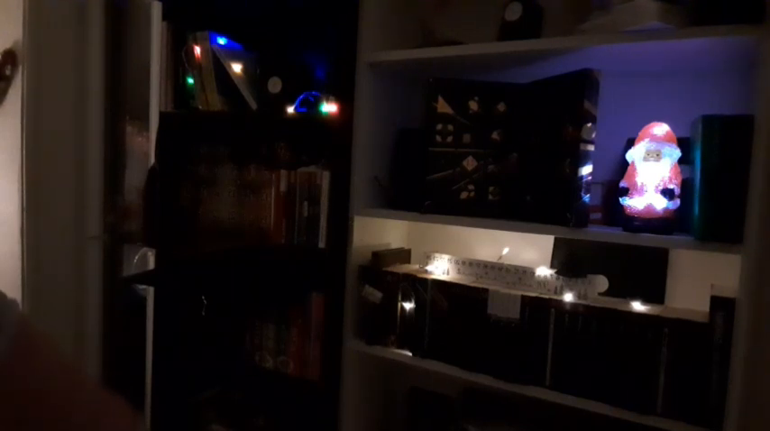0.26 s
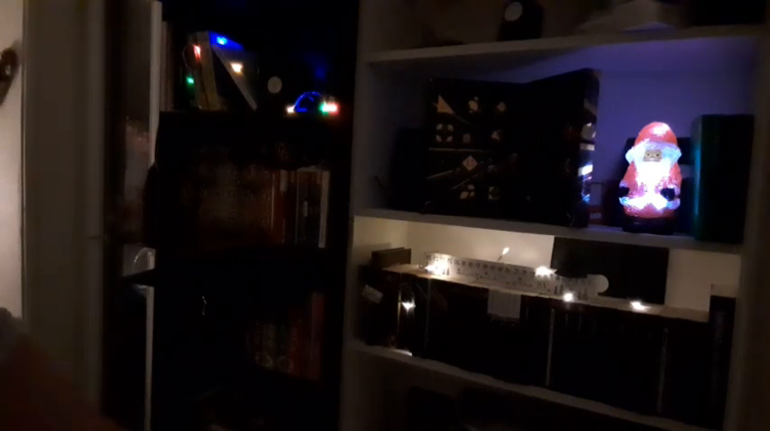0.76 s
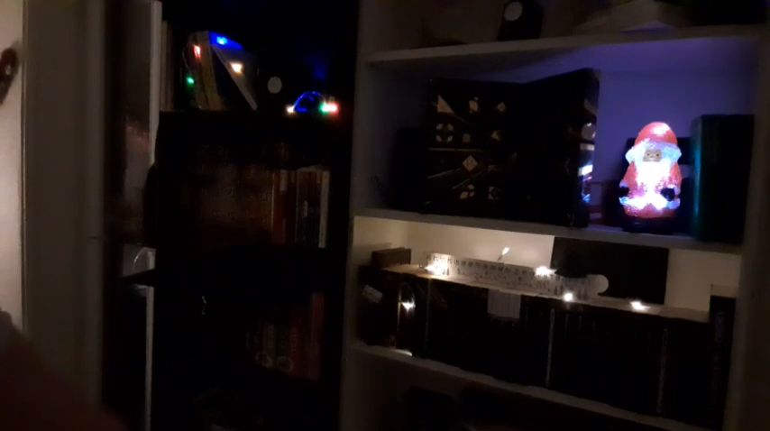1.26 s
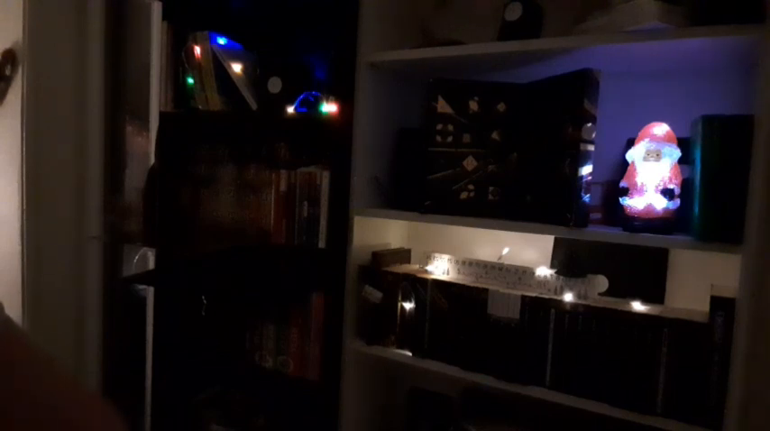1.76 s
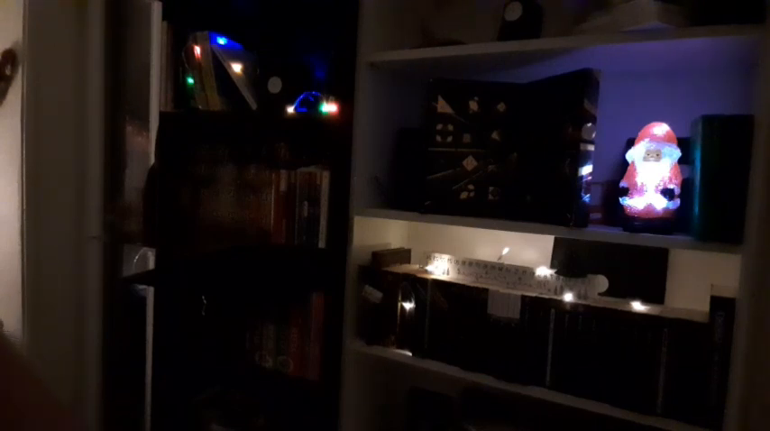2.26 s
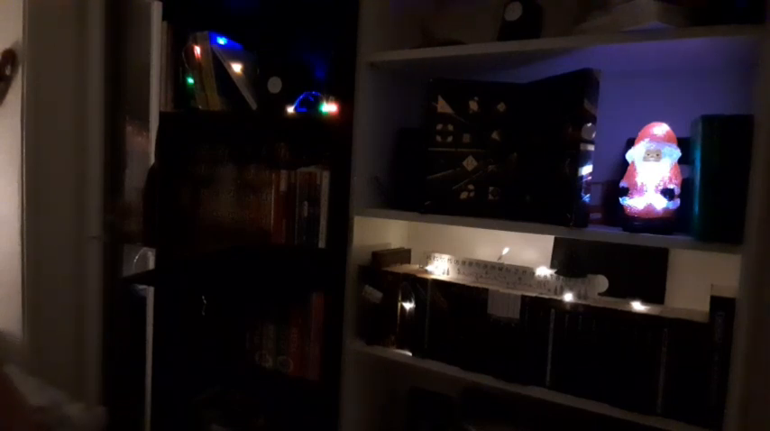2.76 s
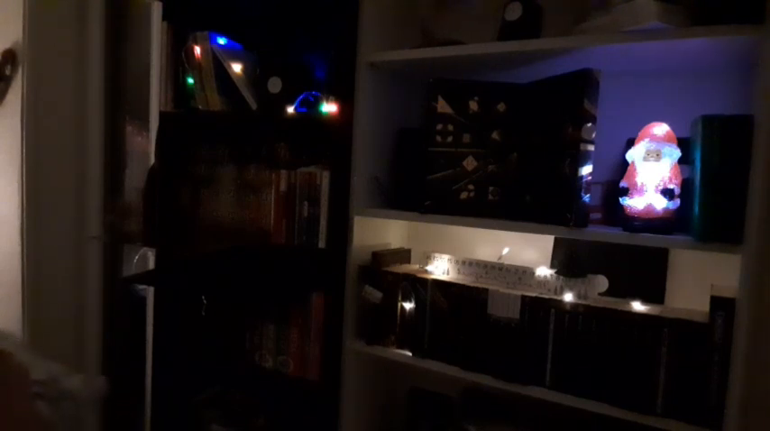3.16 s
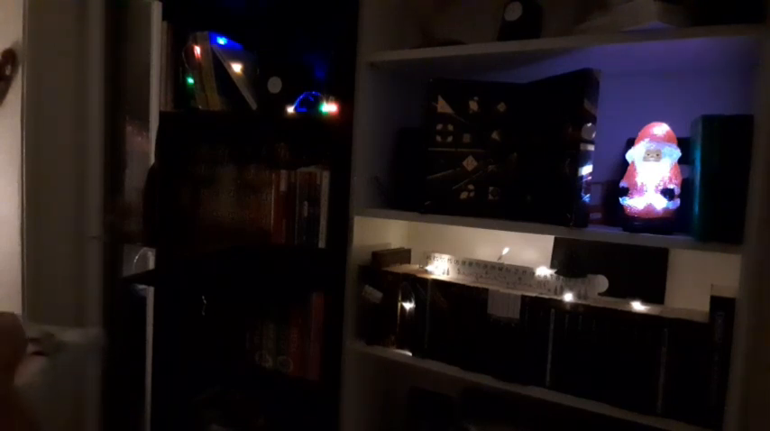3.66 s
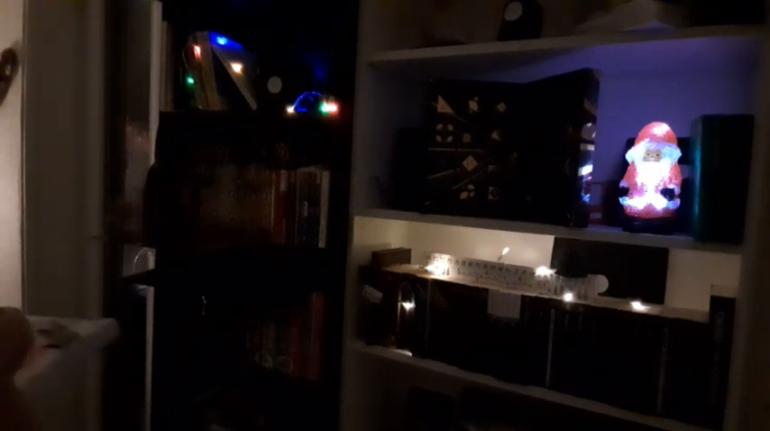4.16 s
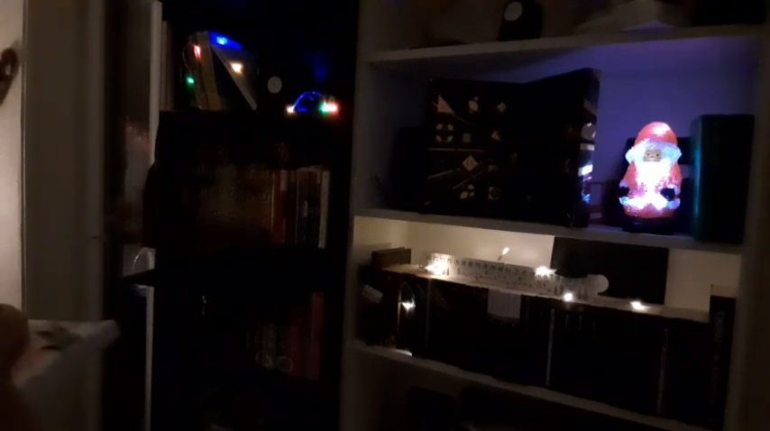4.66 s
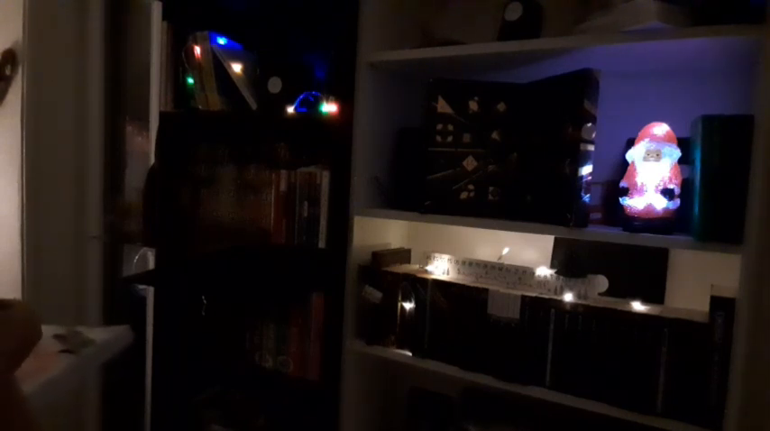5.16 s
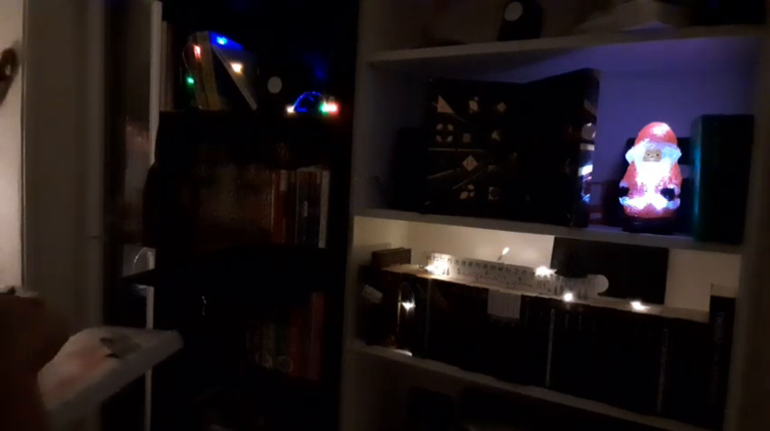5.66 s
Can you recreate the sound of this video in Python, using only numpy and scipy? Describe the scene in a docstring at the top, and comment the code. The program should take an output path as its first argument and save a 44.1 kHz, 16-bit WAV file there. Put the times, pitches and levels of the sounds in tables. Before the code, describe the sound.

Hands tear open a cardboard package with dull pops, then rip and crinkle its stiff plastic wrapper in a quiet room.

```python
"""Dull pops of cardboard, close by and a little to the left, as hands tear a package open.
Fibres break in quick runs and ring the hollow box. The stiff plastic wrapper inside rips, fingertips
slide over it, and its creases buckle in sharp snaps, each trailed by smaller crackles.
A quiet living room rings on after every snap, over a faint steady hush."""
import sys
import numpy as np
from scipy import signal
from scipy.fft import rfft, irfft, next_fast_len
from scipy.io import wavfile

SR = 44100
rng = np.random.default_rng(int(sys.argv[2]) if len(sys.argv) > 2 else 0)


def wrap_up_sound(samples):
    """Save the sound to the file named by the first command line argument, as 16-bit audio."""
    columns = np.atleast_2d(samples).T
    # keep every value between -1 and 1, then stretch to whole-number steps
    tamed = np.clip(columns, -1, 1)
    steps = np.round(tamed * 32767).astype(np.int16)
    wavfile.write(sys.argv[1], SR, steps)


N = 261513
LEAD = SR // 4   # samples of run-in, so that the room already rings at the start
SPAN, ONSET_PAD = SR * 3 // 4, SR // 2000   # samples for one burst and its tail; silent samples before it


def from_db(db):
    return 10 ** (np.asarray(db) / 20)


def rms_one(x):
    return x / np.sqrt(np.mean(x ** 2) + 1e-20)


def later(x, delay_s):
    return np.pad(x, (round(delay_s * SR), 0))[:len(x)]


def at_hz(points, hz, column=1):
    """Reads a column of a table on a log-frequency axis."""
    points = np.array(points)
    return np.interp(np.log(np.maximum(hz, 1)), np.log(points[:, 0]), points[:, column])


def resonator(x, hz, q, above, at, below):
    """A resonance with separate gains above, at and below its frequency."""
    size = next_fast_len(x.shape[-1] + SR // 20)
    s = 1j * np.fft.rfftfreq(size, 1 / SR) / hz
    response = (above * s * s + at * s / q + below) / (s * s + s / q + 1)
    return irfft(rfft(x, size) * response, size)[..., :x.shape[-1]]


def add(track, start_s, sound):
    """Mixes a stereo burst into a track that begins LEAD samples early."""
    start = max(round(start_s * SR) + LEAD - ONSET_PAD, 0)
    track[:, start:start + sound.shape[1]] += sound[:, :track.shape[1] - start]


def grains(size, per_s, spread_db, friction):
    """Random clicks of uneven size over smooth friction noise; rms 1."""
    heights = from_db(spread_db * np.minimum(rng.exponential(1, size), 3)) * rng.choice([-1, 1], size)
    clicks = rms_one(heights * (rng.random(size) < per_s / SR))
    return rms_one(clicks + friction * rng.standard_normal(size))


def crackle(decay_s, first_share, per_s, spread_db, friction, swell):
    """One buckle, with first_share of the energy, sets off an avalanche that swells and dies."""
    t = np.arange(SR // 4) / SR
    envelope = np.exp(-t / decay_s) * (1 - np.exp(-t / (swell * decay_s)))
    burst = grains(len(t), per_s, spread_db, friction) * envelope
    burst *= np.sqrt((1 - first_share) / np.sum(burst ** 2))
    burst[0] = np.sqrt(first_share)
    return np.pad(burst, (ONSET_PAD, SPAN - len(t)))


def sheet(x, ring_hz, ring_db, ring_q, edge_hz, edge_q, bass_db, treble_db, treble_hz):
    """A patch of sheet rings at one resonance, with a bass shelf below edge_hz and a treble shelf."""
    x = resonator(x, ring_hz, ring_q, above=0.86, at=from_db(ring_db), below=0.93)
    x = resonator(x, edge_hz, edge_q, above=0.93, at=from_db(bass_db / 2), below=from_db(bass_db))
    return resonator(x, treble_hz, q=0.68, above=from_db(treble_db), at=from_db(treble_db / 2), below=1)


# Pops of the card giving way. Each row: start in seconds, level in dB, crackle decay in seconds,
# flap ring in Hz, ring boost in dB, treble shelf in dB.
CARD_POPS = [(-0.15, -6.5, .0026, 1240, 18.5, -10.5), (0.085, 7, 0.017, 1150, 17, -25),
             (0.209, 2, 0.00078, 1120, 23, 0.5), (0.2932, -6, 0.0012, 1184, 26.5, -5.5),
             (0.4514, 5.5, 0.0021, 1130, 10, -5), (0.469, 3, 0.0025, 860, 14, 3.5),
             (0.615, 8, 0.01, 860, 11, -1), (1.064, -37.5, 0.078, 488, 12.5, 6),
             (1.239, -28, 0.024, 1110, 20.5, -7), (1.281, -14, 0.012, 1120, 7.5, -15),
             (1.536, -24.5, 0.11, 930, 17.5, 4), (2.203, -4.5, 0.033, 1100, 7.5, -15),
             (2.257, -2, 0.056, 940, 2.5, 1), (2.343, -11.5, .003, 740, 13, -10),
             (2.511, 5, 0.01, 1180, 12.5, 5.5), (2.63, 1.5, 0.037, 830, 6.5, 3),
             (2.72, 8, 0.0033, 1230, 6, 0.5), (2.748, 7, 0.01, 730, 0, -30)]

def card(field):
    """Fibres break in quick runs and shake the loose flap, the panel and the box behind it."""
    out = np.zeros((2, LEAD + N))
    for start_s, db, decay_s, ring_hz, ring_db, treble_db in CARD_POPS:
        first_share = 0.6 / (1 + decay_s / 0.013)   # a longer run leaves less for the first break
        burst = crackle(decay_s, first_share, per_s=3400, spread_db=-0.5, friction=0.24, swell=0.018)
        burst = room(burst, field, straight_db=-10, tail_db=-0.7, left_db=1.1, scatter_s=0.0021)
        # a light push flexes the panel and sounds deeper; the box loses depth as it opens
        bass_db = 5.2 - 0.2331 * db - 1.1 * start_s
        pop = sheet(burst, ring_hz, ring_db, ring_q=2.77, edge_hz=566, edge_q=0.86,
                    bass_db=bass_db, treble_db=treble_db, treble_hz=8300)
        add(out, start_s, from_db(db) * pop)
    panel = resonator(out, hz=1513, q=16.5, above=0.99, at=1.7, below=0.98)
    return box(panel, width_hz=6.9)


# The hollow body of the box. Each row: mode frequency in Hz, boost or cut in dB.
BOX_MODES = [(172, 4.5), (212, 3), (272, 9), (513, -1.5), (615, 7.5), (649, 2), (733, 7.5), (878, 2),
             (985, -3), (1138, 7.5), (1281, -1), (1497, -2), (1590, 7)]

def box(x, width_hz):
    """The hollow box rings along in narrow modes."""
    size = next_fast_len(x.shape[1] + SR)
    hz = np.fft.rfftfreq(size, 1 / SR)
    lift = 1 + sum((from_db(db) - 1) / (1 + 2j * (hz - mode_hz) / width_hz) for mode_hz, db in BOX_MODES)
    return irfft(rfft(x, size) * lift, size)[:, :x.shape[1]]


# Colour and width of the reverb. Each row: frequency in Hz, level in dB, left-right correlation.
REVERB_COLOUR = [(120, -3, 0.72), (262, 1, 0.84), (495, 1, 0.85), (980, 4, -0.065), (2000, 2, -0.08),
                 (5000, 1.5, 0.025), (14900, -6, 0.0054)]
# Length of the reverb. Each row: frequency in Hz, seconds to fall by 60 dB.
REVERB_T60 = [(150, 0.51), (400, 0.48), (1000, 0.48), (2800, 0.47), (7300, 0.4), (15000, 0.3)]

def diffuse_field():
    """Stereo noise in octave bands, each with the share of its power that survives a sample in the room."""
    size = next_fast_len(N + 2 * SR)
    hz = np.fft.rfftfreq(size, 1 / SR)
    mid, side = rfft(rng.standard_normal((2, size)))
    alike = np.clip(at_hz(REVERB_COLOUR, hz, column=2), -1, 1)
    spectrum = np.sqrt((1 + alike) / 2) * mid + np.sqrt((1 - alike) / 2) * side * [[1], [-1]]
    spectrum *= from_db(at_hz(REVERB_COLOUR, hz))
    octave = np.round(np.log2(np.clip(hz, 200, 16000)))
    bands = []
    for k in np.unique(octave):
        survives = np.exp(-2 * np.log(1000) / SR / at_hz(REVERB_T60, 2 ** k))
        bands.append((irfft(spectrum * (octave == k), size), survives))
    return bands


def smear(power, survives):
    """Spreads power into an exponential tail."""
    return signal.lfilter([1 - survives], [1, -survives], power)


# Early reflections. Each row: left delay in seconds, right delay in seconds, level in dB.
REFLECTIONS = [(.0023, 0.0018, -7.5), (.0061, 0.0095, -10.5), (.0072, 0.011, -25)]

def room(clicks, field, straight_db, tail_db, left_db, scatter_s):
    """Each click comes from another spot, so echoes add in power; only the straight path keeps its shape."""
    size = len(clicks)
    power = smear(clicks ** 2 + 1e-18, np.exp(-1 / (scatter_s * SR)))   # shelves and walls scatter it
    start = rng.integers(field[0][0].shape[1] - size)
    tail = sum(noise[:, start:start + size] * np.sqrt(smear(power, survives)) for noise, survives in field)
    tail *= from_db([[tail_db + left_db], [tail_db - left_db]])
    early_power = sum(np.array([later(power, left_s), later(power, right_s)]) * from_db(db) ** 2
                      for left_s, right_s, db in REFLECTIONS)
    early = np.sqrt(early_power) * rng.standard_normal((2, size))
    straight = np.array([clicks, from_db(-7) * later(clicks, 0.00029)])   # weaker and later on the right
    return tail + early + from_db(straight_db) * straight


# The bed of still room air. Each row: frequency in Hz, relative spectral level in dB.
AIR_SPECTRUM = [(15, -48), (25, -9), (170, 2), (317, -0.5), (695, -10), (988, -6), (1370, -5), (5000, -10),
                (6920, -12.5), (9320, -23.5), (11900, -7), (14800, -8.5), (16000, -6)]

def air(level_db, shared_gain):
    """A faint steady hush, partly common to both sides."""
    shared, left, right = rng.standard_normal((3, N))
    noise = shared_gain * shared + np.array([left, right])
    colour = from_db(at_hz(AIR_SPECTRUM, np.fft.rfftfreq(N, 1 / SR)))
    return from_db(level_db) * rms_one(irfft(rfft(noise) * colour, N))


def facets(x, lift_db):
    """Four facets around a crease ring along, at pitches that change with every fold."""
    for hz in np.exp(rng.uniform(np.log(2000), np.log(14000), 4)):
        x = resonator(x, hz, q=10, above=1, at=from_db(lift_db), below=1)
    return x


# Rips in the taut wrapper. Each row: start in seconds, level in dB, crackle decay in seconds,
# facet ring in Hz, ring boost in dB.
WRAPPER_RIPS = [(1.263, -20, 0.011, 5900, 4), (1.298, -21, 0.0068, 4120, 18.5),
                (1.584, -8, 0.0033, 10300, 10), (1.6122, 1.5, 0.0088, 3320, 8),
                (1.6813, 2.5, 0.029, 3560, 5), (1.849, -0.5, 0.053, 3100, 13), (1.95, -10, 0.0028, 8750, 4),
                (1.9733, -8.5, 0.0025, 6400, 9), (2.0411, -14, 0.00124, 5160, 16),
                (2.0618, -6.5, 0.011, 7700, 11), (2.108, -10, 0.0049, 8400, 10),
                (2.436, -8.5, 0.012, 3550, 23.5), (2.605, 5.5, .011, 2734, 8)]

def rips(field):
    """Stretched over the box, the film tears in short, full-bodied runs of clicks."""
    out = np.zeros((2, LEAD + N))
    for start_s, db, decay_s, ring_hz, ring_db in WRAPPER_RIPS:
        burst = crackle(decay_s, first_share=0.44, per_s=820, spread_db=-5.5, friction=0.14, swell=0.05)
        burst = room(burst, field, straight_db=-8.5, tail_db=-0.5, left_db=1.1, scatter_s=0.00017)
        burst = facets(burst, lift_db=3)
        edge_hz = 300 * 2 ** (-2.5 * ring_db)   # far below hearing, so the rip keeps its body
        rip = sheet(burst, ring_hz, ring_db, ring_q=5.8, edge_hz=edge_hz, edge_q=1.3,
                    bass_db=0, treble_db=5, treble_hz=8296)
        add(out, start_s, from_db(db) * rip)
    return out


# Finger slides on the wrapper. Each row: start in seconds, length in seconds, level in dB.
FINGER_STROKES = [(1.305, 0.26, -66.5), (1.558, 0.15, -56), (1.954, 0.2, -54), (2.413, 0.28, -44.5),
                  (3.261, 0.6, -66.5), (3.486, 0.25, -47.5), (3.827, 0.75, -61), (4.738, 0.47, -60)]

def fingers(field, attack_s=0.018, release_s=0.047):
    """Fingertips slide over the film with a fine, continuous crackle; each stroke swells, holds and dies."""
    t = np.arange(N) / SR
    pressure = np.zeros(N)
    for start_s, length_s, db in FINGER_STROKES:
        attack = np.clip((t - start_s) / attack_s, 0, 1)
        release = np.exp(-np.maximum(t - start_s - length_s, 0) / release_s)
        pressure += from_db(db) * attack * release
    rub = grains(N, per_s=300, spread_db=5, friction=0.65) * pressure
    rub = room(rub, field, straight_db=-2, tail_db=-0.6, left_db=0.4, scatter_s=0.0006)
    return resonator(rub, hz=4500, q=0.54, above=0.55, at=2.37, below=0.13)


# Creases snapping in the loose wrapper. Each row: start in seconds, level in dB, crackle decay in
# seconds, facet ring in Hz, ring boost in dB, treble shelf in dB.
CREASE_SNAPS = [(3.002, -24.5, .008, 2000, 22, -6), (3.2226, -21, 0.0044, 3500, 11, -20),
                (3.379, -25.5, .008, 4500, 22, -1), (3.4249, -13, .007, 2130, 19, -5),
                (3.4893, -4.5, 0.026, 4870, 8.5, -21), (3.514, -1.5, 0.013, 3100, -4, -24),
                (3.618, -1.5, 0.0031, 4140, 9.5, -26), (3.677, -2, 0.014, 7900, 11.5, 1.5),
                (3.7187, -3, 0.01, 4500, 10.5, 6), (3.847, -14, 0.017, 9000, 17.5, -7),
                (3.8822, -3.5, 0.01, 2180, 10, 15.5), (3.9499, 1, 0.00077, 12100, 9.5, 4),
                (4.013, 3, 0.0039, 9100, 12.5, 1.5), (4.1189, 5.5, 0.0035, 4700, 3, 5),
                (4.3073, -8.5, .002, 7640, 2, -0.5), (4.365, -5, 0.0024, 4700, 3.5, -5),
                (4.4214, 0.5, 0.01, 8700, 5, -2.5), (4.443, -1.5, 0.0023, 2490, -4, 2),
                (4.6683, -5.5, 0.0054, 10000, 6, 2), (4.732, -9, 0.00067, 5330, 16.5, 7.5),
                (4.836, -10, .002, 4300, -2, 9.5), (4.966, -10.5, 0.01, 9600, 10.5, 6),
                (4.982, -2.5, 0.013, 2300, 3, 3), (5.0295, -6.5, 0.0054, 4370, 8, 6),
                (5.0858, -6.5, 0.0043, 2360, 17, 13), (5.223, -3.5, .006, 3760, 4, -29),
                (5.332, -8.5, 0.0068, 6770, 7, 9), (5.685, -12.5, 0.0024, 5700, -0.5, -13)]

def snaps(field):
    """Each crease that flips rings the facet next to it and sets off a few smaller ones."""
    out = np.zeros((2, LEAD + N))
    for start_s, db, decay_s, ring_hz, ring_db, treble_db in CREASE_SNAPS:
        first_share = np.exp(-decay_s / 0.026)   # a longer crackle leaves less for the flip itself
        burst = crackle(decay_s, first_share, per_s=700, spread_db=11.5, friction=0.1, swell=0.043)
        straight_db = -8.5 + 5 * first_share   # a clean flip beams more sound straight ahead
        burst = room(burst, field, straight_db, tail_db=-2, left_db=1.3, scatter_s=0.00022)
        burst = facets(burst, lift_db=3.5)
        edge_hz = 1660 * 2 ** (-0.11 * db)   # a stronger snap moves a larger patch, which radiates lower
        snap = sheet(burst, ring_hz, ring_db, ring_q=3.8, edge_hz=edge_hz, edge_q=1.3,
                     bass_db=-7.5, treble_db=treble_db, treble_hz=8390)
        add(out, start_s, from_db(db) * snap)
    return out


def bending(x, delay_at_1khz_s):
    """Bending waves carry high notes faster: a click leaves as a tiny falling chirp."""
    size = next_fast_len(x.shape[-1])
    khz = np.fft.rfftfreq(size, 1 / SR) / 1000
    lag = np.exp(-4j * np.pi * delay_at_1khz_s * 1000 * np.sqrt(khz))
    return irfft(rfft(x, size) * lag, size)[..., :x.shape[-1]]


def wrapper(x):
    """The stiff film rings as a whole at one resonance, and is too light to move much air in the bass."""
    ringing = resonator(x, hz=2220, q=8.8, above=0.95, at=1.08, below=0.96)
    chirped = bending(ringing, delay_at_1khz_s=0.000531)
    return resonator(chirped, hz=275, q=0.64, above=0.88, at=0.23, below=0)


def microphone(x):
    """The small ports lose the bass and have a dip in the treble."""
    x = resonator(x, hz=201, q=0.62, above=0.96, at=0.17, below=0.018)
    return resonator(x, hz=9000, q=4.17, above=0.95, at=from_db(-8.5), below=1)


def scene():
    """Card, wrapper and fingers share one room, over its hush."""
    field = diffuse_field()
    package = card(field) + wrapper(rips(field) + snaps(field))
    hands = package[:, LEAD:] + fingers(field)
    return microphone(hands) + air(level_db=-67.5, shared_gain=0.46)


def record(dry):
    """A steep low-pass cuts the top at 16 kHz."""
    return signal.sosfilt(signal.ellip(10, 0.2, 70, 16000, fs=SR, output="sos"), dry)


dry = scene()
out = record(dry)
wrap_up_sound(out)
```